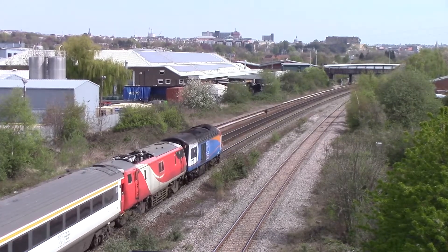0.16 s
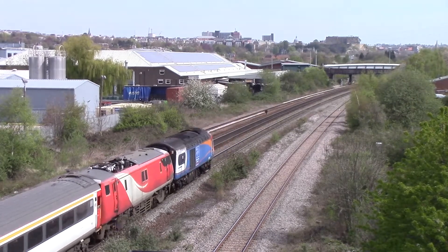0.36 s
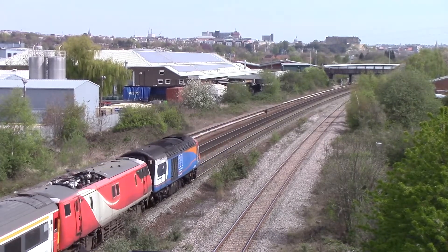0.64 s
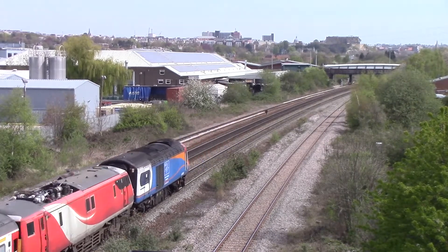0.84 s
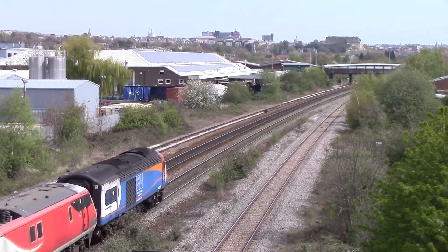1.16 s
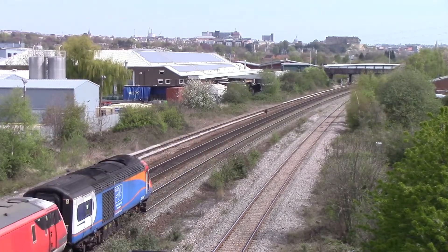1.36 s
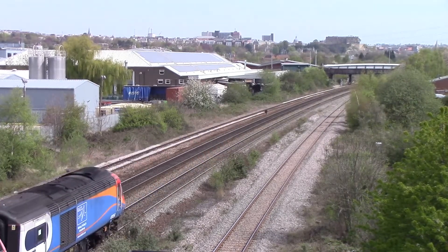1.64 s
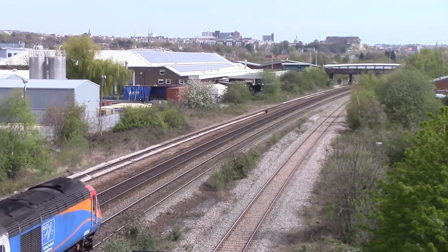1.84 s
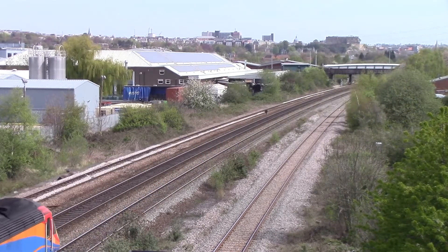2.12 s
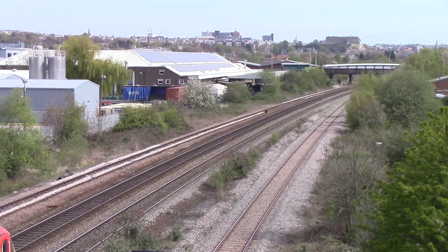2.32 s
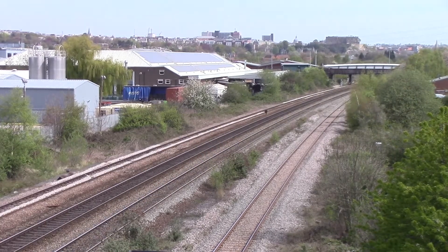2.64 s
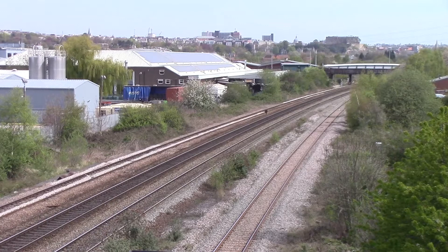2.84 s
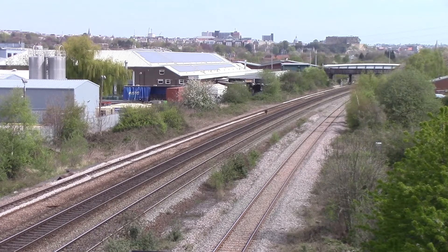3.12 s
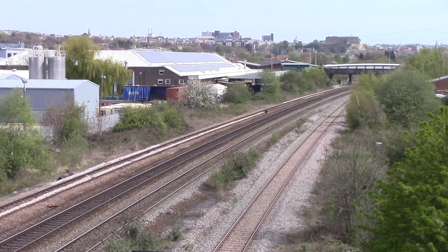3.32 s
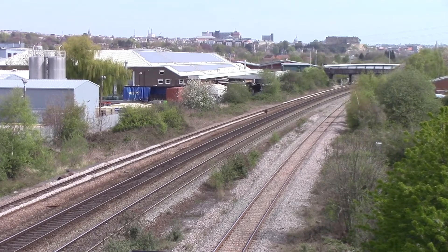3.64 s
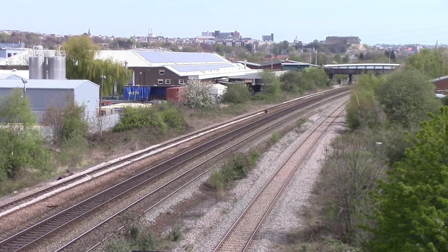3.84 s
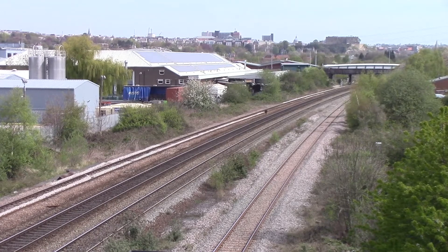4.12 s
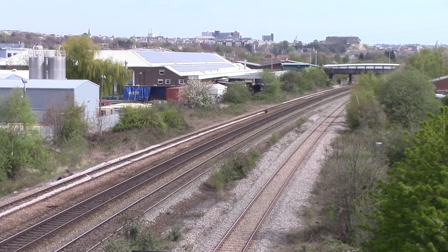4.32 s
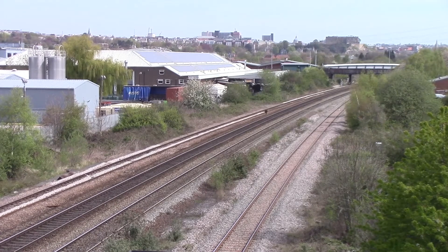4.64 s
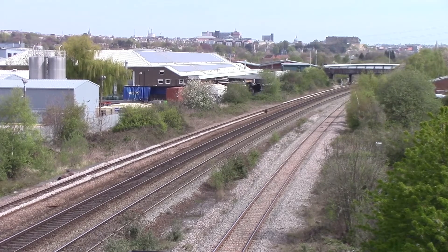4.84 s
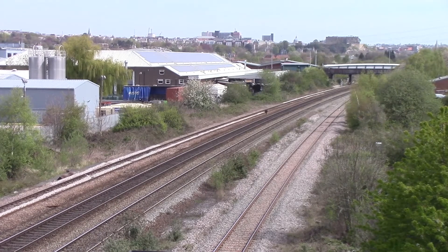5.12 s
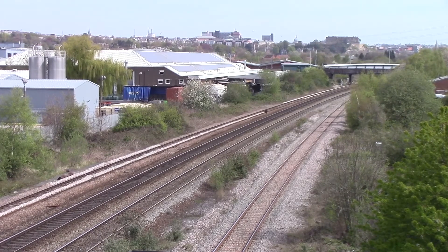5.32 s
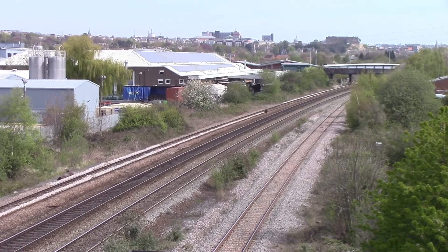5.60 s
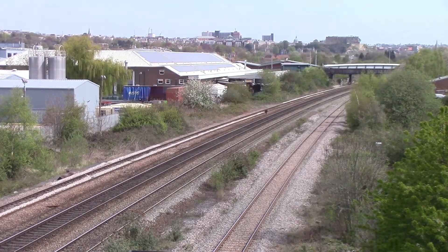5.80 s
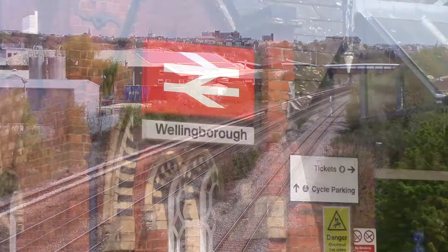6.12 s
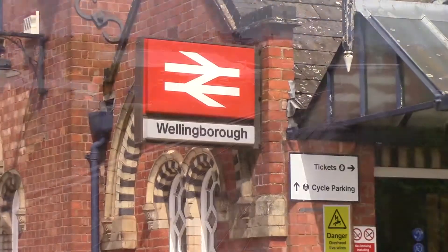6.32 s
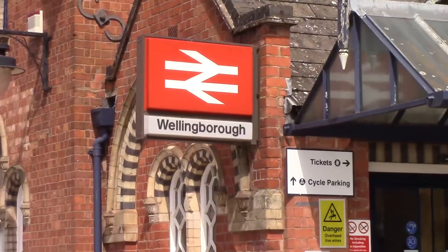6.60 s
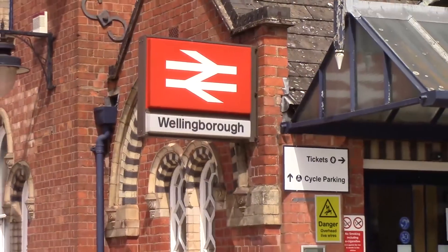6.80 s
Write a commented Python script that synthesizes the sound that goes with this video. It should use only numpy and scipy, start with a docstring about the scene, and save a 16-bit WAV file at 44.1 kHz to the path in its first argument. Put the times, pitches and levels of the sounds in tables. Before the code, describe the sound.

Outdoors, from a bridge above the track, a diesel express is already roaring by at the start. Dense, gritty wheel and rail noise dominates, with quick irregular metallic knocks until about 1.2 seconds. The rear power car approaches: a hollow engine note, rushing exhaust hiss and a shrill, twinkling turbo whistle grow strongest around 1.5 to 3 seconds, with a fine sizzle near 2.5. About 3.5 seconds it passes underneath; hiss and whistle dull suddenly, pitch slides down, and the bridge returns a smeared whistling echo. The rolling roar continues, fading and swelling again, with low wind booms and a tiny sharp tick near 4.7. A last knock lands at 6.1, then an abrupt cut leaves a much quieter station front: faint distant town wash and hum, with low fluttering wind buffets, strongest around 6.3 to 6.65, until the end near seven seconds.

```python
"""A diesel express runs under a bridge, heard from above: wheels and rails roar (shaped noise) and knock
(noise bursts); the rear power car hisses and whistles (noise, firing sine, turbo blade tone), and low
wind booms at the microphone. Near 3.5 s the bridge hides the car's roof, pitch falls with Doppler shift
and the bridge echoes the whistle. At 6.127 s an abrupt cut: a quiet station front, wind and buffets at
the microphone over distant town wash and hum. Small fizzes, ticks and spits (noise bursts) dot both."""
import sys
import numpy as np
from scipy import signal
from scipy.fft import rfft, irfft
from scipy.io import wavfile
from scipy.ndimage import uniform_filter1d

SR = 44100
rng = np.random.default_rng(int(sys.argv[2]) if len(sys.argv) > 2 else 0)


def unload_wav(signal):
    """Save mono or channel-first audio to the path in sys.argv[1] as 16-bit WAV at rate SR, clipped to [-1, 1]."""
    wavfile.write(
        sys.argv[1],
        SR,
        np.round(np.clip(np.atleast_2d(signal).T, -1, 1) * 32767).astype(np.int16),
    )


N = 306936
T = np.arange(N) / SR
HZ = np.fft.rfftfreq(N, 1 / SR)

# rolling noise, before trim and flutter: time_s, rail_level_db, wheel_level_db
ROLLING = [(0.0, -16, -18.5), (0.24, -13.5, -20), (0.49, -17, -24.5), (1.12, -16, -19.5),
           (1.33, -15.5, -21), (2.14, -17.5, -18.5), (2.71, -14.5, -18.5), (3.32, -20, -18),
           (3.66, -21.5, -26), (3.76, -18.5, -22), (3.79, -21.5, -23), (4.71, -21, -23.5), (5.6, -16, -22),
           (5.75, -14, -27), (6.08, -14, -25), (6.11, -14.5, -31)]
# noise colours, levelled later: freq_hz, relative_db
RUMBLE_COMING = [(25, -46), (55, -45), (105, -33), (150, -16.5), (220, -5), (330, 1), (480, 0), (700, -9.5),
                 (1300, -19.5), (4000, -64.5)]
RUMBLE_GOING = [(25, -46), (55, -39.5), (105, -26.5), (160, -7.5), (250, 1), (340, 0), (480, 5), (700, -2),
                (1300, -30), (4000, -67.5)]
RAILS_COMING = [(60, -42), (250, -22.5), (450, -5), (650, 0), (880, 1.5), (1080, 1), (1300, -1.5),
                (1650, -2), (2100, -11.5), (3000, -25.5), (7000, -48), (15000, -61.5)]
RAILS_GOING = [(60, -55.5), (250, -26), (450, -11), (650, -3), (860, 1), (1080, 1), (1300, -2),
               (1600, -2.5), (2100, -11), (3000, -20.5), (7000, -51), (15000, -71)]
WHEELS_COMING = [(200, -47), (1200, -10.5), (2000, 1), (2400, 0.5), (2700, -1.5), (3100, -1), (3600, -3.5),
                 (4500, -9), (6000, -10.5), (9000, -28), (15000, -67)]
WHEELS_GOING = [(200, -48), (1200, -1.5), (1950, 6), (2400, 1), (2900, -1.5), (3500, -5.5), (4500, -12),
                (6000, -15.5), (9000, -41.5), (15000, -56)]
HISS = [(500, -31.5), (3500, -10), (6000, 3.5), (7300, 4.5), (8700, -0.5), (10000, -6.5), (11500, -10.5),
        (12600, -14.5), (14000, -20.5), (15600, -28.5)]
WIND_BOOM = [(20, -15.5), (50, -16.5), (75, -16), (100, -10), (140, 1.5), (190, 4), (300, -12.5),
             (1500, -64.5)]
GUST = [(25, -46), (60, -32), (110, -8), (170, 3), (300, 1), (450, -4.5), (700, -21.5), (1200, -37),
        (4000, -75)]
TOWN = [(30, -24.5), (130, 3), (260, -5.5), (480, -7.5), (1100, -9), (1800, -15), (2500, -21),
        (4500, -29.5), (9000, -36), (15500, -42)]
# filter on scattered whistle, weak below the receding pitch: freq_hz, gain_db
SCATTER = [(4300, -10.5), (4900, -8), (5250, -0.5), (9000, 3)]
# stereo width of sound from ahead, behind, all round, and of small wind eddies: freq_hz, side_vs_mid_db
WIDTH_AHEAD = [(100, -63), (1300, -80.5), (2400, -62), (3200, -39), (4400, -13.5), (6000, -16), (8000, -18),
               (10000, -5.5), (15000, -17)]
WIDTH_BEHIND = [(100, -60), (700, -62), (1100, -36), (2000, -25.5), (3000, -18.5), (4400, -8), (6000, -6.5),
                (8500, -3.5), (12000, -8), (15000, -13.5)]
WIDTH_AROUND = [(100, -43), (300, -23), (750, -22), (1400, -18), (2800, -8), (8000, -9), (15000, -14)]
WIDTH_EDDIES = [(120, -54), (260, -35), (450, -15), (900, -3)]
# wheels knocking on the track: start_s, level_db, centre_hz
KNOCKS = [(.098, -10, 1000), (.132, -19, 730), (.308, -14, 1000), (.395, -21.5, 250), (.634, -9, 422),
          (.685, -19, 222), (.752, -21, 600), (.855, -9.5, 447), (.975, -14.5, 600), (1.2, -8.5, 740),
          (6.108, -12, 905)]
# faint very high fizzes of noise (first two rows), then ticks and spits: start_s, level_db, centre_hz, decay_s
TICKS = [(.262, -46, 14000, 0.018), (.4, -44, 15500, .012), (3.42, -27, 10500, 0.069),
         (4.729, -9.5, 4600, 0.0019), (4.75, -20, 4600, 0.0032), (5.322, -26.5, 7950, 0.014),
         (5.331, -35.5, 14490, .007), (6.295, -48, 3005, .005), (6.912, -34, 3200, 0.0011)]
# hiss rushes from the passing cars: centre_s, level_db, sigma_s
RUSHES = [(.16, -35.5, 0.12), (6.05, -42.5, .08)]
# wind booms: centre_s, level_db, sigma_s
BOOMS = [(.16, -47, .2), (.67, -33, 0.057), (.88, -35.5, 0.06), (3.58, -38, .07), (3.8, -36, .06),
         (4.25, -39.5, 0.11), (5.65, -44, 0.33)]
# blade tone flares: centre_s, boost_db, sigma_s
BLADE_FLARES = [(1.74, 16, .02), (1.92, 12, 0.057), (2.14, 10, 0.075), (2.34, 10, .045), (3.08, 5, .03),
                (3.24, 7, .03), (3.35, 7.5, .03), (3.52, 6, .06)]
# stronger whistle echoes: centre_s, level_db, sigma_s
ECHO_FLARES = [(2.99, -24, .07), (3.3, -23, .07), (4.15, -25, 0.058)]
# wind gusts, before flutter: centre_s, level_db, sigma_s
GUSTS = [(6.22, -24.5, 0.03), (6.3, -28.5, 0.019), (6.365, -22.5, 0.023), (6.44, -28.5, 0.048),
         (6.58, -25, 0.028), (6.646, -21.5, .018), (6.705, -35, .013), (6.78, -43.5, .015),
         (6.845, -39, 0.022)]
# single wind buffets: start_s, peak_db, pitch_hz
BUFFETS = [(6.158, -23.5, 201), (6.296, -17, 170), (6.351, -20, 290), (6.367, -19, 278), (6.411, -22, 332),
           (6.46, -22, 210), (6.551, -15, 620), (6.556, -16, 253), (6.613, -14, 240), (6.626, -14, 302),
           (6.641, -23, 700), (6.875, -20, 210)]
# distant machinery, before drift: pitch_hz, level_db
HUM = [(377, -47.5), (1211, -69), (5561, -74), (6180, -81)]

CUT_S = 6.127
PASS_S, SPEED_M_PER_S, DISTANCE_M = 3.613, 30.2, 22  # power car nearest
SOUND_M_PER_S = 343
HIDDEN_S, HIDING_S = 3.485, 0.099  # bridge hides the roof
KNOCK_DECAY_S = 0.018
FIRING_HZ, HOLLOW_HZ = 75.5, 814.4  # before Doppler
BLADE_HZ, SPOOL_HZ_PER_S = 5626, 33.6  # at the pass, before Doppler; slow rise
ECHO_HZ, ECHO_FROM_S = 5325, 3.39
BREEZE_DB = -52  # between gusts
BUFFET_RISE_CYCLES = 0.66
LOW_CUT_HZ, HIGH_CUT_HZ = 70, 15700


def amp(db):
    """Decibels to gain."""
    return 10 ** (np.asarray(db) / 20)


def unit(x):
    """Scales to rms 1."""
    return x / np.sqrt(np.mean(x ** 2) + 1e-20)


def curves(rows):
    """Interpolates each column of a time table to every sample."""
    time_s, *columns = np.transpose(rows)
    return [np.interp(T, time_s, column) for column in columns]


def shape(points, hz):
    """Gain of a spectrum table on a log-frequency axis."""
    freq_hz, db = np.transpose(points)
    return amp(np.interp(np.log(hz + 1), np.log(freq_hz), db))


def colour(x, points):
    """Filters x by a spectrum table."""
    return irfft(rfft(x) * shape(points, HZ), N)


def drift(rate_hz):
    """Slow random motion of rms 1."""
    return unit(irfft(rfft(rng.standard_normal(N)) / (1 + (HZ / rate_hz) ** 2), N))


def hump(at_s, sigma_s):
    """Bell curve in time, height 1."""
    return np.exp(-0.5 * ((T - at_s) / sigma_s) ** 2)


def after(at_s, fade_s):
    """Smooth step from 0 to 1."""
    return 0.5 + 0.5 * np.tanh((T - at_s) / fade_s)


def swells(rows, bed_db):
    """Gain of a steady bed, power-summed with bell-shaped swells."""
    swell_power = sum((amp(db) * hump(s, sigma_s)) ** 2 for s, db, sigma_s in rows)
    return np.sqrt(amp(bed_db) ** 2 + swell_power)


def flares(rows):
    """Gain of 1 with short bell-shaped boosts in dB."""
    return amp(sum(db * hump(s, sigma_s) for s, db, sigma_s in rows))


def pair(mid, side, width):
    """Left and right of two close microphones from mid and width-filtered side."""
    side = colour(side, width)
    return np.array([mid + side, mid - side])


def noise(spectrum, width, patchy_db):
    """Stereo noise of rms 1, its spectrum dappled by short-lived patches."""
    frames = dict(nperseg=1024, noverlap=768)
    _, _, z = signal.stft(rng.standard_normal((2, N)), SR, **frames)
    patches = uniform_filter1d(rng.standard_normal(z.shape[1:]), size=6, axis=0)
    patches = uniform_filter1d(patches, size=14, axis=1)
    dappled = signal.istft(z * amp(patchy_db * unit(patches)), SR, **frames)[1][:, :N]
    mid, side = colour(dappled, spectrum)
    return unit(pair(mid, side, width))


def whistle(hz, width_hz):
    """Narrow noise band carried along the pitch hz; stereo, rms 1."""
    skirt = 1 / np.sqrt(1 + (2 * HZ / width_hz) ** 2)
    skirt = skirt / (1 + (HZ / 1500) ** 4)  # trims far sidebands
    a, b = irfft(rfft(rng.standard_normal((2, 2, N))) * skirt, N)
    phase = 2 * np.pi * np.cumsum(hz * np.ones(N)) / SR
    mid, side = a * np.cos(phase) + b * np.sin(phase)
    return unit(pair(mid, side, WIDTH_AHEAD))


def bursts(rows, octaves):
    """Puffs of band noise, each with a quick rise and its own decay."""
    out, t = np.zeros(N + 8192), np.arange(8192) / SR
    hz = np.fft.rfftfreq(8192, 1 / SR)
    for start_s, db, centre_hz, decay_s in rows:
        band = np.exp(-0.5 * (np.log2((hz + 1) / centre_hz) / octaves) ** 2)
        envelope = np.exp(-t / decay_s) * (1 - np.exp(-10 * t / decay_s))
        puff = unit(irfft(rfft(rng.standard_normal(len(t))) * band) * envelope)
        out[round(start_s * SR):][:len(t)] += amp(db) * puff * np.sqrt(np.mean(envelope ** 2))
    return out[:N]


def nearness(at_s, half_s):
    """1 / distance gain of a straight pass, 1 when nearest."""
    return 1 / np.hypot(1, (T - at_s) / half_s)


def passing(coming, going, patchy_db):
    """Equal-power change of noise colour and stereo width at the pass."""
    past = after(PASS_S, fade_s=0.086)
    approach = np.sqrt(1 - past) * noise(coming, WIDTH_AHEAD, patchy_db)
    return approach + np.sqrt(past) * noise(going, WIDTH_BEHIND, patchy_db)


def power_car():
    """Distance gain and Doppler factor of the rear power car."""
    half_s = DISTANCE_M / SPEED_M_PER_S
    near = nearness(PASS_S, half_s)
    closing_m_per_s = SPEED_M_PER_S * (PASS_S - T) / half_s * near
    return near, 1 / (1 - closing_m_per_s / SOUND_M_PER_S)


def from_roof(db, beam_db, shadow_db, beam_s, beam_sigma_s):
    """Roof source gain: grows with nearness, beams at the microphone a while, then is hidden."""
    near, _ = power_car()
    beam = beam_db * hump(beam_s, beam_sigma_s)
    return near * amp(db + beam + shadow_db * after(HIDDEN_S, HIDING_S))


def rolling():
    """Rough wheels shake track, rails and themselves; contact force flutters in all three."""
    rail_db, wheel_db = curves(ROLLING)
    contact = drift(55)
    power_car_shake = amp(-25.5) * nearness(3.34, half_s=0.55)  # heavier car
    shaking = np.hypot(amp(rail_db - 11.5), power_car_shake)
    rumble = passing(RUMBLE_COMING, RUMBLE_GOING, patchy_db=-0.05) * shaking * amp(0.49 * contact)
    rails = passing(RAILS_COMING, RAILS_GOING, patchy_db=0.33) * amp(rail_db + 0.66 + 0.67 * contact)
    wheels = passing(WHEELS_COMING, WHEELS_GOING, patchy_db=1.18) * amp(wheel_db + 0.36 + 0.16 * contact)
    rushes = noise(HISS, WIDTH_AHEAD, patchy_db=2.5) * swells(RUSHES, bed_db=-63)
    return rumble + rails + wheels + rushes


def exhaust():
    """Doppler-shifted firing tone and hollow note, turbulent hiss and a brief fine sizzle."""
    near, doppler = power_car()
    firing = unit(np.sin(2 * np.pi * np.cumsum(FIRING_HZ * doppler) / SR)) * near * amp(-56.5)
    hollow = unit(colour(whistle(HOLLOW_HZ * doppler, width_hz=89), RAILS_COMING))
    hollow = hollow * from_roof(-26.5, beam_db=11, shadow_db=-7, beam_s=1.4, beam_sigma_s=0.73)
    hiss = noise(HISS, WIDTH_AHEAD, patchy_db=1.0)
    hiss = hiss * from_roof(-24, beam_db=8.5, shadow_db=-12.5, beam_s=2.3, beam_sigma_s=0.6)
    sizzle = whistle(12200, width_hz=6500) * nearness(2.49, half_s=0.17) ** 2
    sizzle = sizzle * amp(-24.5 - 11 * after(HIDDEN_S, HIDING_S))
    return firing + hollow + (hiss + sizzle) * amp(1.3 * drift(9.8))


def turbo():
    """Blade tone twinkles through hot exhaust, partly scattered to fuzz; whines an octave up and down."""
    _, doppler = power_car()
    hz = (BLADE_HZ + SPOOL_HZ_PER_S * (T - PASS_S)) * doppler
    phase = 2 * np.pi * np.cumsum(hz + 13 * drift(40)) / SR
    lead = 0.16 * drift(8)  # radians, opposite at each microphone
    tone = unit(np.sin([phase + lead, phase - lead]) * amp(2.2 * drift(25))) * flares(BLADE_FLARES)
    tone = tone * from_roof(-28.5, beam_db=11.5, shadow_db=-15, beam_s=2.63, beam_sigma_s=1.0)
    fuzz = colour(whistle(hz, width_hz=410), SCATTER) * amp(1.1 * drift(60))
    fuzz = fuzz * from_roof(-24.5, beam_db=9.5, shadow_db=-12.0, beam_s=2.77, beam_sigma_s=1.0)
    octave_up = whistle(2 * hz, width_hz=650)
    octave_up = octave_up * from_roof(-43, beam_db=10.5, shadow_db=-13, beam_s=2.35, beam_sigma_s=0.92)
    octave_down = whistle(hz / 2, width_hz=90)
    octave_down = octave_down * from_roof(-30, beam_db=11, shadow_db=-17, beam_s=1.4, beam_sigma_s=0.45)
    return tone + fuzz + octave_up + octave_down


def wind_booms():
    """Low wind booms at the microphone, over a faint low bed: swelling low noise."""
    return noise(WIND_BOOM, WIDTH_AHEAD, patchy_db=0.5) * swells(BOOMS, bed_db=-54)


def knocks():
    """Wheels strike the track: short bursts of broad band noise."""
    return bursts([(*row, KNOCK_DECAY_S) for row in KNOCKS], octaves=0.57)


def fizzes_and_ticks():
    """Faint very high fizzes, then small ticks and spits: narrower noise bursts."""
    return bursts(TICKS, octaves=0.23)


def bridge_echo():
    """The bridge returns a smeared whistle and octave at fixed pitch, fading as the train leaves."""
    near, _ = power_car()
    echo = whistle(ECHO_HZ, width_hz=150) + amp(-22) * near * whistle(2 * ECHO_HZ, width_hz=700)
    echo = colour(echo, SCATTER) * amp(0.9 * drift(12))
    under_bridge = amp(-25) * near ** 1.3 * after(ECHO_FROM_S, fade_s=0.07)
    return echo * np.hypot(under_bridge, swells(ECHO_FLARES, bed_db=-71))


def town():
    """Distant town wash: steady patchy noise from all round."""
    return amp(-43) * noise(TOWN, WIDTH_AROUND, patchy_db=2.5)


def hum():
    """Distant machinery: sines with wandering pitch and a shared wandering level."""
    out = np.zeros(N)
    for pitch_hz, db in HUM:
        phase = 2 * np.pi * np.cumsum(pitch_hz + 5 * drift(15.6)) / SR
        out += amp(db) * unit(np.sin(phase))
    return out * amp(2 * drift(6))


def wind():
    """Small eddies hit the microphones separately: fluttering low noise in gusts."""
    return noise(GUST, WIDTH_EDDIES, patchy_db=0.2) * swells(GUSTS, BREEZE_DB) * amp(1.1 * drift(50))


def buffets():
    """Each eddy striking the microphone rocks the pressure for a few cycles."""
    out, t = np.zeros(N + 4096), np.arange(4096) / SR
    for start_s, peak_db, hz in BUFFETS:
        age = t * hz / BUFFET_RISE_CYCLES
        swell = (age * np.exp(1 - age)) ** 2
        rocking = np.sin(2 * np.pi * (hz * t + rng.random()))
        out[round(start_s * SR):][:len(t)] += amp(peak_db) * swell * rocking
    return out[:N]


def scene():
    """Train and wind booms, then an abrupt cut to the station; fizzes and ticks over both."""
    train = rolling() + exhaust() + turbo() + wind_booms() + knocks() + bridge_echo()
    station = town() + hum() + wind() + buffets()
    return np.where(T < CUT_S, train, station) + fizzes_and_ticks()


def record(dry):
    """Cuts deep bass, rounds off the highest peaks, then limits the band."""
    high_pass = signal.butter(3, LOW_CUT_HZ, "highpass", fs=SR, output="sos")
    thin = signal.sosfilt(high_pass, dry)
    rounded = thin / (1 + thin ** 8) ** (1 / 8)
    low_pass = signal.firwin(511, HIGH_CUT_HZ, window=("kaiser", 9), fs=SR)
    return signal.oaconvolve(rounded, low_pass[None], "same")


dry = scene()
out = record(dry)
unload_wav(out)
```